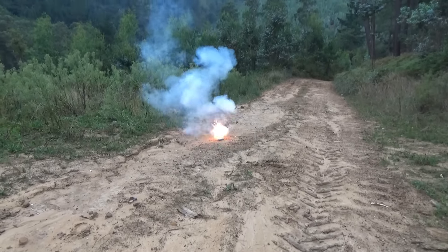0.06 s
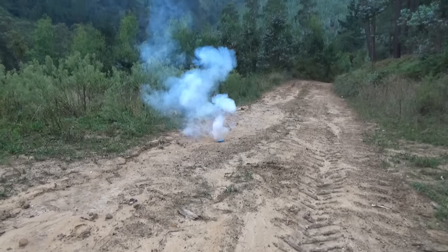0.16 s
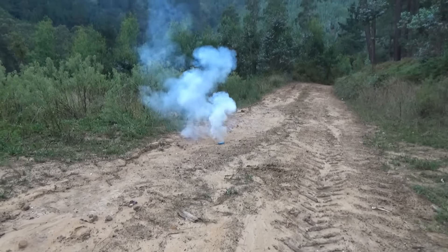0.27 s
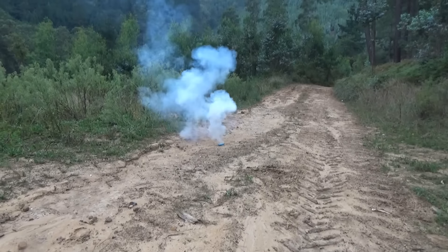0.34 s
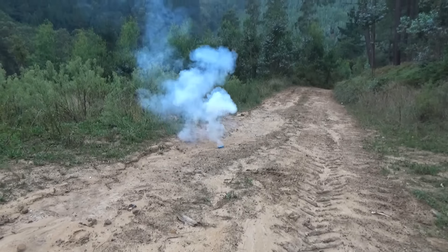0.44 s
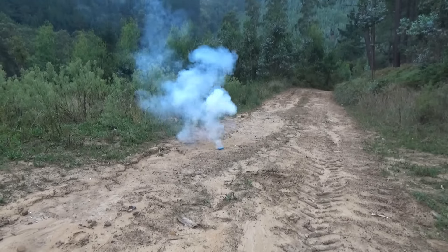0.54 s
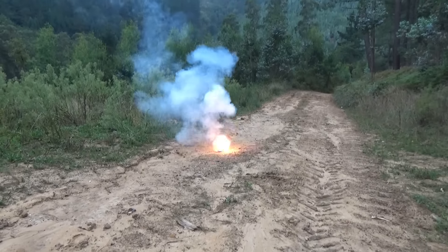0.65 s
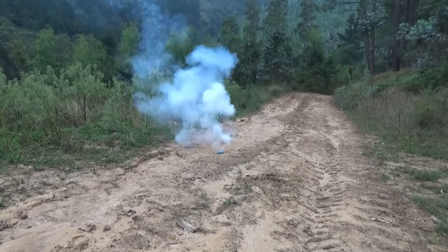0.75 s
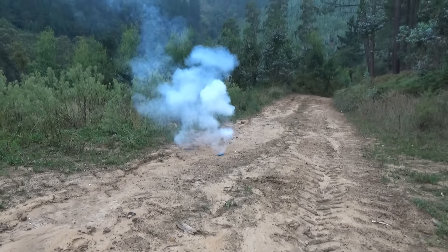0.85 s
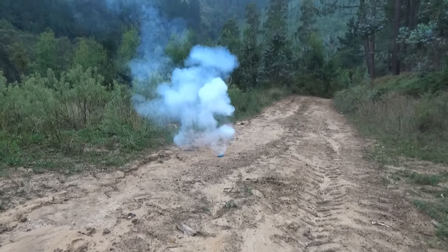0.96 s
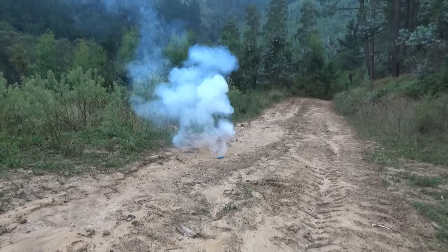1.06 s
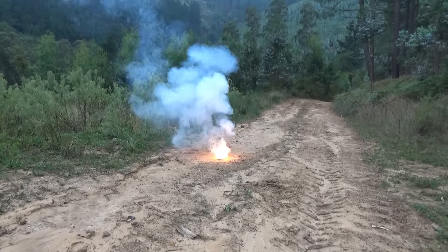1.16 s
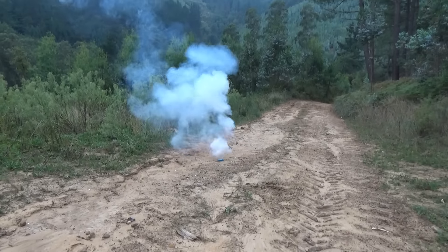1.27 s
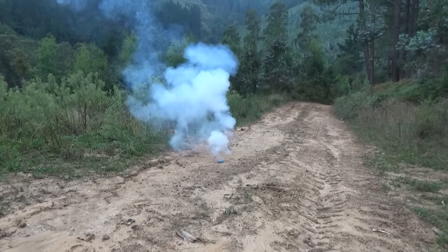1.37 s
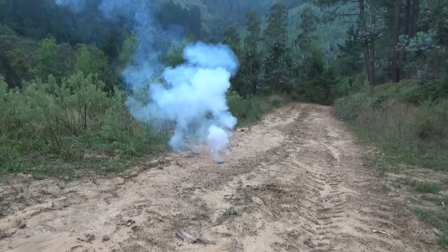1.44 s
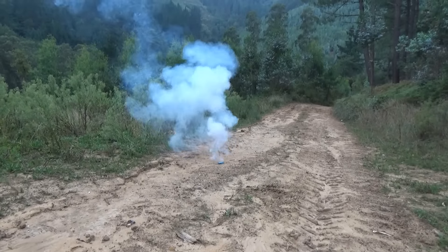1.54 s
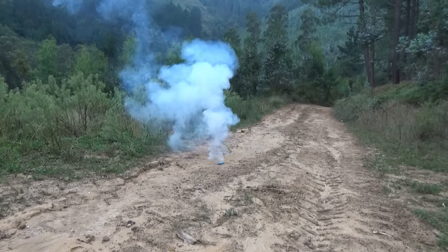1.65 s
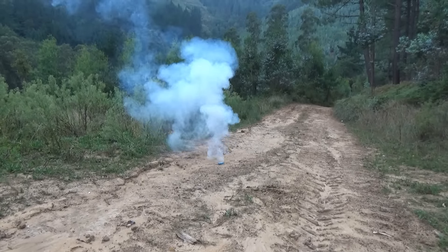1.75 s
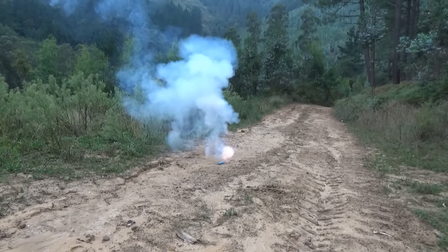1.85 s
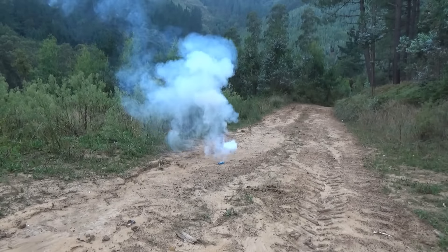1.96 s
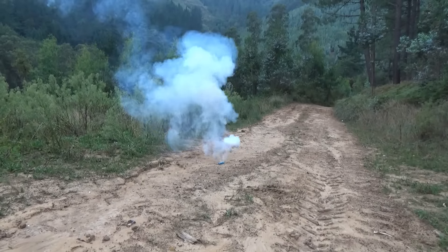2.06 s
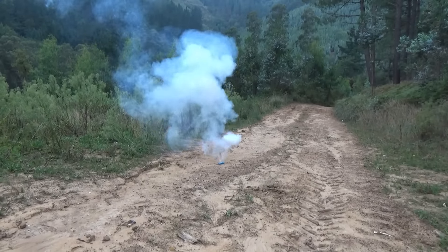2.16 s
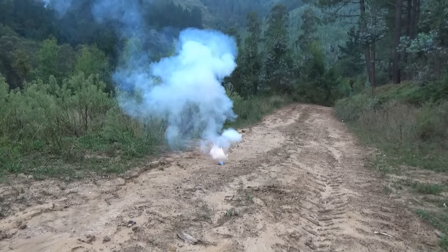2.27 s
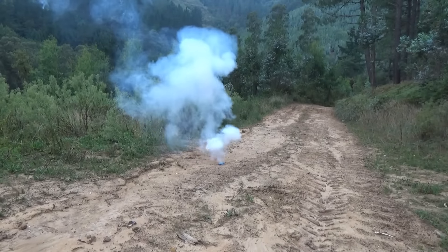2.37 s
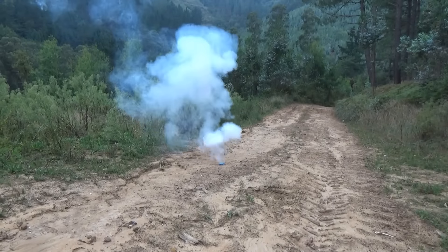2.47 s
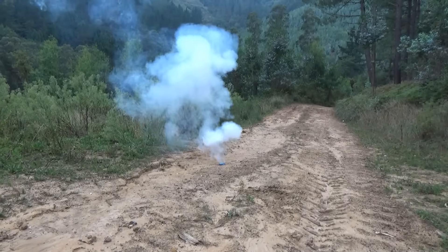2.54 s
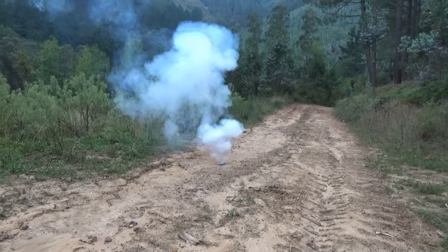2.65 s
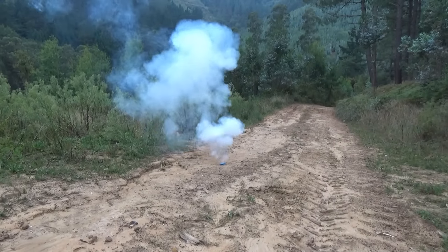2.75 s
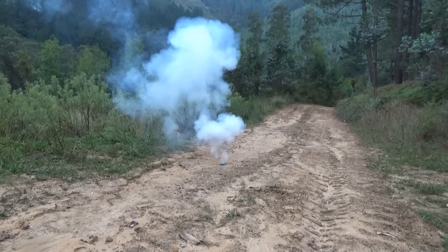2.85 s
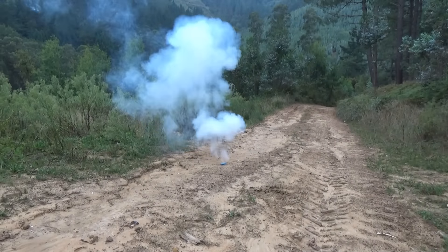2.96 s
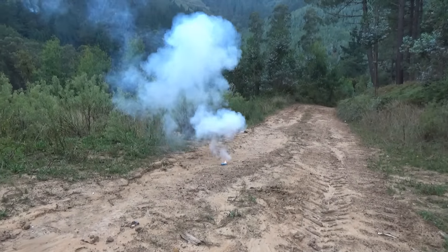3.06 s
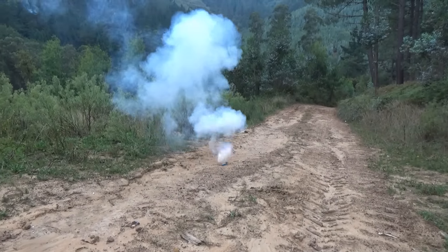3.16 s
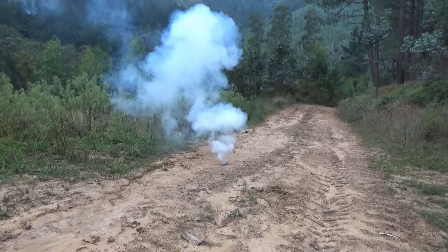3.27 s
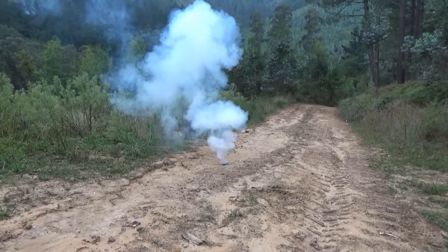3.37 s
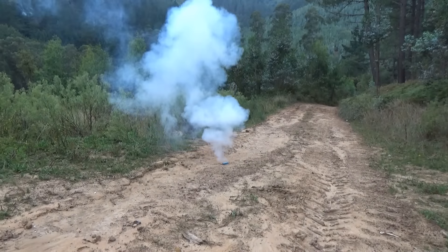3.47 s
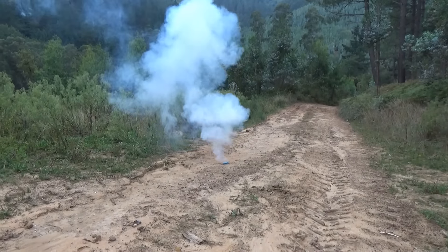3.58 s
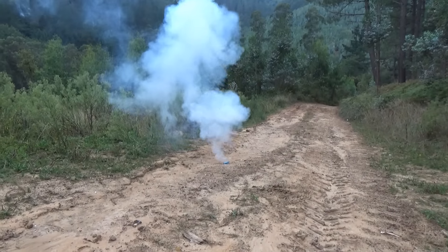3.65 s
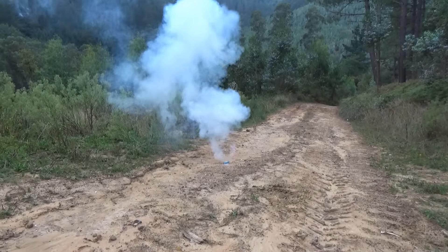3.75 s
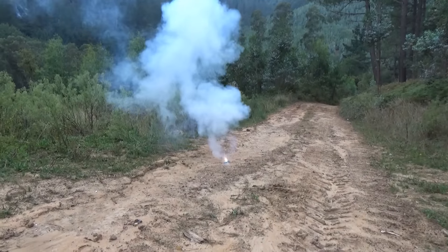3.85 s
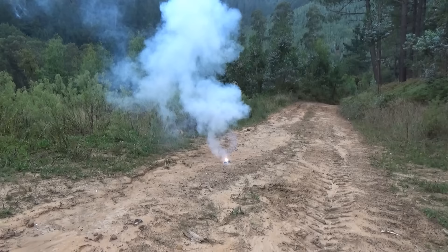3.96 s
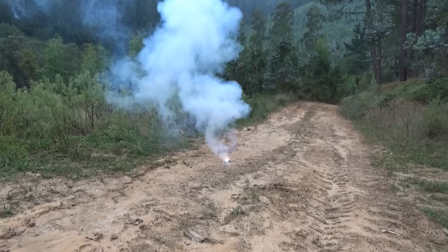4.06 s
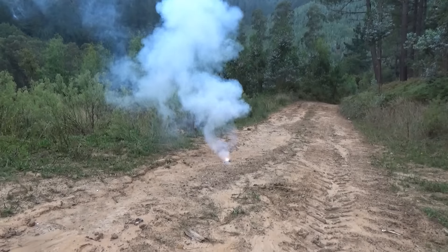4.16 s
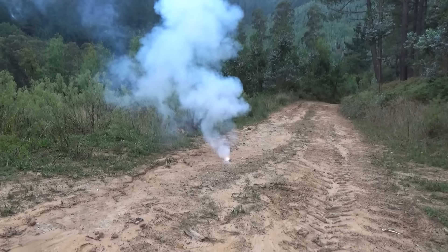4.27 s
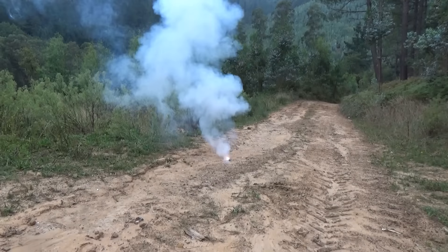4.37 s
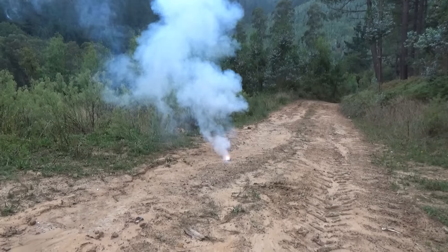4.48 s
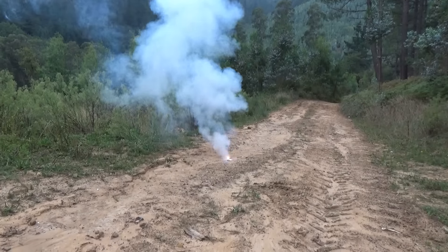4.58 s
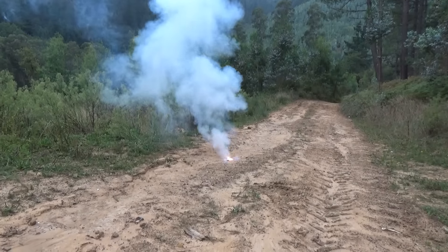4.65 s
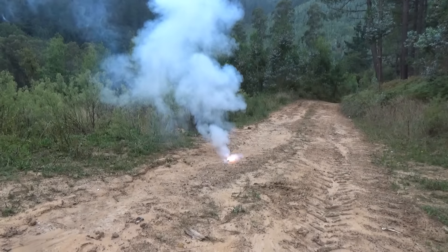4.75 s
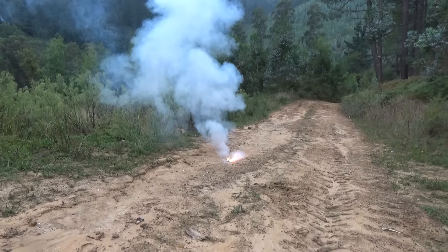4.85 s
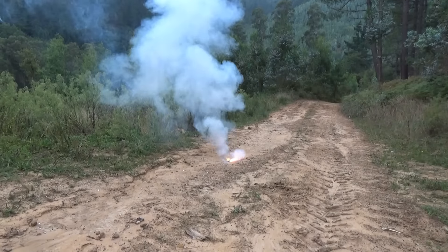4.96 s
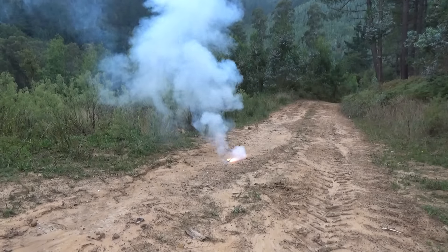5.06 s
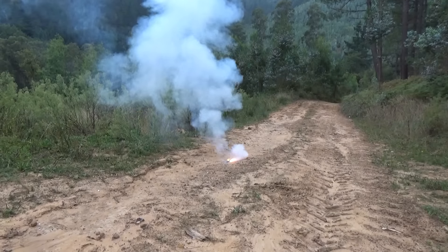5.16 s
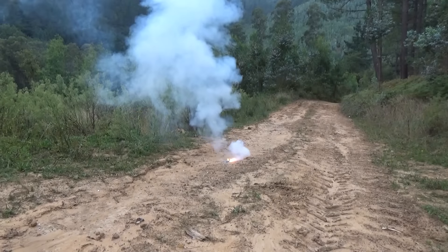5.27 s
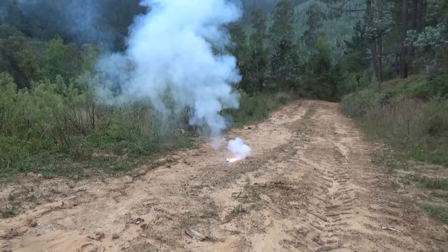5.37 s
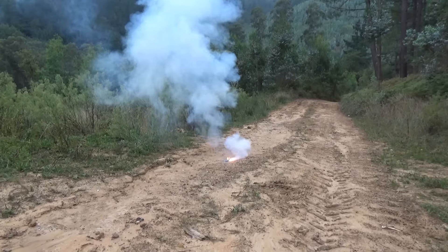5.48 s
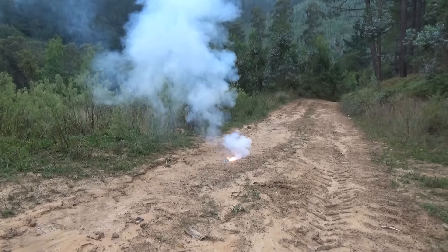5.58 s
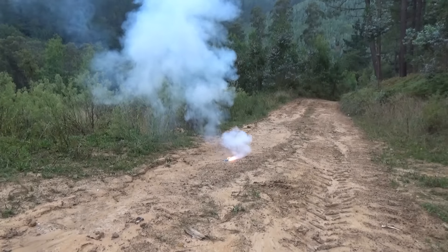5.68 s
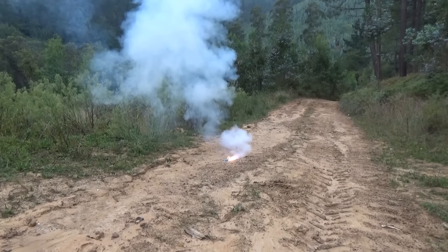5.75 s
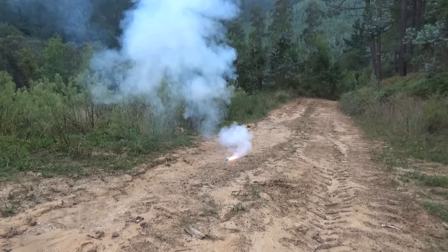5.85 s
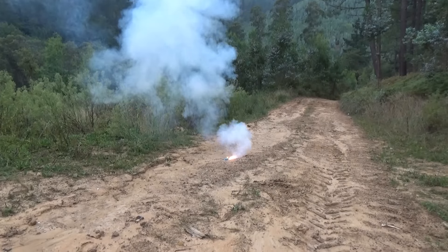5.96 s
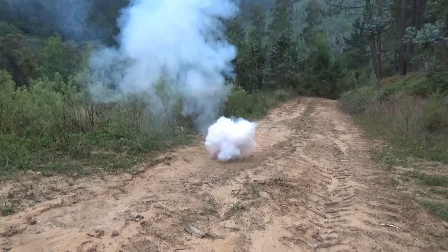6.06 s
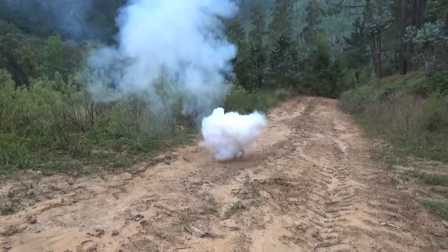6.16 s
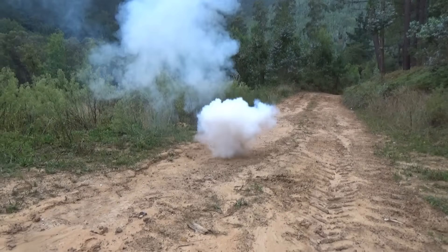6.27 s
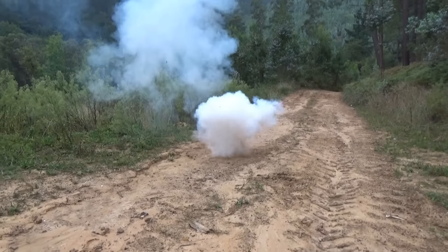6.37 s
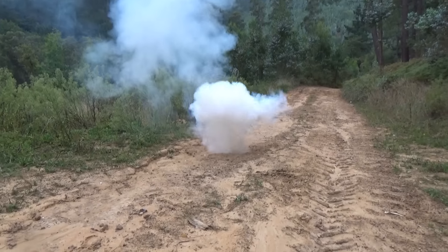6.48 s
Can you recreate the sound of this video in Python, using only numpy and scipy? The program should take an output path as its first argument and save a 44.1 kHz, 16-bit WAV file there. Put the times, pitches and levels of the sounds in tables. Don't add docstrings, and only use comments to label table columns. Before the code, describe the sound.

Outdoors on a dirt track among trees, a fuse hisses softly while seven hard, dry firecracker bangs go off about half a second apart, each with a low thump and a short ragged echo. Two soft gas puffs follow, then a rushing flame that sizzles and spits crackling sparks, ending in one loud blast with a dense roll. The microphone is some way off and limits the loudest peak.

```python
import sys
import numpy as np
from scipy import signal
from scipy.fft import rfft, irfft, next_fast_len
from scipy.io import wavfile
from scipy.ndimage import uniform_filter1d

SR = 44100
rng = np.random.default_rng(int(sys.argv[2]) if len(sys.argv) > 2 else 0)


def generate_wav(sig):
    pcm = np.round(np.clip(np.atleast_2d(sig).T, -1, 1) * 32767).astype(np.int16)
    wavfile.write(sys.argv[1], SR, pcm)


def rack_gain(trim_db):
    fader = np.asarray(trim_db, float)
    return 10 ** (fader / 20)


N = 287532
BLAST_S = 6.0765


def add(out, x, s):
    i = int(round(s * SR))
    out[:, i:i + x.shape[-1]] += x[..., :N - i]


def on_log(table, hz):
    f, db = np.transpose(table)
    return np.interp(np.log(hz + 1), np.log(f), db)


def walk(rate, size):
    hold = int(SR / rate)
    steps = np.repeat(rng.standard_normal(size // hold + 1), hold)
    return 0.92 * uniform_filter1d(uniform_filter1d(steps, hold), hold)[:size]


# (frequency [Hz], side minus mid level [dB])
DIFFUSENESS = [(40, -24.5), (110, -17.5), (250, -17), (700, -22.5), (2000, -20.5), (4000, -30.5),
               (6500, -14), (9500, -20.5), (13000, -37), (16000, -32)]


def rush(rows, colour, wide_db, flicker_db, clump_db, clump_rate):
    s, *levels = np.transpose(rows)
    size = next_fast_len(int((s[-1] - s[0]) * SR))
    hz = np.arange(size // 2 + 1) * SR / size
    t = s[0] + np.arange(size) / SR
    mid, side = rfft(rng.standard_normal((2, size))) * rack_gain(on_log(colour, hz))
    side = side * rack_gain(on_log(DIFFUSENESS, hz) + wide_db)
    pair = np.array([mid + side, mid - side])
    above = [1] + [1 / (1 + (edge / (hz + 1)) ** 10) for edge in (600, 4500, 11000)] + [0]
    clump = clump_db * walk(clump_rate, size)
    out = 0
    for k, db in enumerate(levels):
        band = irfft(pair * np.sqrt(above[k] - above[k + 1]), size)
        level_db = np.interp(t, s, db) + flicker_db * walk(13, size) + clump
        out = out + band / band.std() * rack_gain(level_db)
    return out


def follow(curve, tone_db, share=0):
    s, db, *extra_db = np.transpose(curve)[..., None]
    return np.hstack([s, db + tone_db + sum(extra_db) * np.array(share)])


def swells(events, start, end, tone_db, air_db_s, bend):
    t = np.arange(start, end, 1 / 1000)[:, None]
    lean = np.array((-0.69, -0.18, 0.71, 1.6))
    power = 1e-12
    for s, db, rise_s, fall_s, bright_db in events:
        away = np.where(t < s, (s - t) / rise_s, (t - s) / fall_s)
        power = power + rack_gain(db - 20 * away ** bend + bright_db * lean) ** 2
    return np.hstack([t, 10 * np.log10(power) + tone_db - np.multiply(air_db_s, t - start)])


def ring(hz, t60, phase, size=2000):
    t = np.arange(size) / SR
    return np.cos(2 * np.pi * hz * t - phase) * rack_gain(-60 * t / t60)


def dull(x, hz):
    return signal.sosfilt(signal.butter(2, min(hz, 20000), fs=SR, output="sos"), x)


def burst(rise_s, fall_s, hz):
    t = (np.arange(2500) - 1000) / SR
    envelope = np.exp(np.where(t < 0, t / rise_s, -t / fall_s))
    mid, side = dull(rng.standard_normal((2, len(t))), hz) * envelope
    return mid + 0.32 * side * np.array([[1], [-1]])


# (frequency [Hz], spectral density [dB per Hz])
SMOULDER_COLOUR = [(24, -49), (40, -5), (61, -4.5), (124, -3), (163, -5.5), (320, -10), (585, -10),
                   (1240, -9.5), (1900, -5.5), (2100, -13), (2570, -9.5), (4460, -13.5), (7000, -4.5),
                   (11600, -13), (16000, -14)]


def still_valley(out):
    still_db = (-50.5, -44.5, -62.5, -71)
    rows = [(0, *still_db), (N / SR, *still_db)]
    add(out, rush(rows, SMOULDER_COLOUR, wide_db=-7, flicker_db=1.5, clump_db=.5, clump_rate=33), 0)


# (time [s], level [dB])
SMOULDER = [(0, -44), (.5, -45.5), (.73, -42), (1.0, -61), (1.2, -42), (1.68, -45), (1.8, -40.5),
            (1.88, -33.5), (2.26, -43), (2.62, -47), (2.76, -54), (2.78, -36), (2.87, -47), (3.15, -69),
            (3.45, -43.5), (3.7, -43), (3.95, -43.5), (4.15, -54)]


def smoulder(out):
    rows = follow(SMOULDER, (-18, -3.5, -4.5, -9.5))
    add(out, rush(rows, SMOULDER_COLOUR, wide_db=-7, flicker_db=1.2, clump_db=1, clump_rate=33), 0)


# (time [s],
# level [dB], frequency [Hz])
POPS = [(0.096, -22, 500), (2.6468, -22, 382), (2.651, -25, 310), (2.6655, -13, 355), (3.148, -13.5, 286),
        (3.1542, -25, 294), (3.581, -21, 243), (3.61, -20, 190), (6.0704, -4.5, 490), (6.0841, -4.5, 384),
        (6.0922, -11, 304), (6.1, -10, 334), (.5, -33.5, 150), (6.174, -16, 170), (6.219, -10, 150),
        (6.265, -14, 200), (6.301, -14, 259), (6.471, -8, 280)]


def pops(out):
    for s, db, hz in POPS:
        add(out, rack_gain(db + 2) * ring(hz, 5.5 / hz, np.pi / 2), s)


# (time [s], front level [dB], thump level [dB], echo level [dB], far slope level [dB])
BANGS = [
    (0.1006, -3, -20.5, 1, 2),
    (0.7338, -11, -14, 0.5, 1.5),
    (1.2003, 0.5, -9, -0.5, 3),
    (1.8854, -4.5, -16.5, 0.5, 0.5),
    (2.281, -1.5, -13.5, -1, 2.5),
    (2.656, -7, -18.5, -3, 0.5),
    (3.1596, 1.5, -11.5, -1, 1.5),
]
# (delay [s], level [dB], rise [s], fall [s], brightness [dB])
FOREST = [
    (.011, -22.5, 0.014, 0.052, -9.5),
    (.024, -26, .015, 0.014, 9.5),
    (.04, -17, 0.02, 0.014, -4),
    (.05, -21, 0.0071, 0.0084, 6.5),
    (.06, -15.5, 0.014, 0.036, -1),
    (.09, -22.5, 0.015, 0.041, 2.8),
    (.122, -29, 0.037, 0.062, 5.5),
    (.155, -25, 0.078, 0.19, 3.5),
    (.29, -44, 0.062, 0.11, -26),
    (.33, -40.5, 0.45, 0.35, 1.5),
]
# (delay [s], level [dB], ring frequency [Hz])
TRUNKS = [
    (.0022, -18, 1100),
    (.008, -7, 744),
    (.0285, -4, 6000),
    (.0358, -5.5, 3000),
    (.0625, -9, 1700),
    (.0895, -13, 2600),
    (.1425, -19, 2450),
    (.173, -52, 2200),
]
# (frequency [Hz], spectral density [dB per Hz])
ECHO_COLOUR = [(24, -54), (40, -16), (231, -7.5), (345, -13.5), (412, -13.5), (455, -8.5), (615, -8),
               (770, -7.5), (896, -5), (2770, -4), (4240, -13), (9690, -12), (16000, -22)]


def bangs(out):
    answer = swells(FOREST, .002, .62, (-14.5, -0.5, -4.5, -6.5), (21.5, 6, 22.5, 104), bend=1.24)
    fixed = rush(answer, ECHO_COLOUR, wide_db=1, flicker_db=.8, clump_db=2.4, clump_rate=400)
    t = answer[0][0] + np.arange(fixed.shape[1]) / SR
    for k, (s, db, hz) in enumerate(TRUNKS):
        side_db = np.array([[1.2], [-1.2]]) * (-1.0) ** k
        add(fixed, rack_gain(db) * ring(hz, 5 / hz, 0.74) * rack_gain(side_db), max(s - t[0], 0))
    lean_db = np.array([[-.3], [.3]])
    far = np.clip((t - .07) / .04, 0, 1)
    for s, front_db, thump_db, echo_db, far_db in BANGS:
        front = rack_gain(front_db + 2) * ring(350, .0066, 0) + rack_gain(thump_db) * ring(135, .05, 3.7)
        front[:4] = -.6 * np.array([0.29, 0.75, 0.55, .2])
        add(out, front * np.array([[1.05], [.95]]), s - 4 / SR)

        ragged_db = -12 - 0.55 * (thump_db + 10.5)
        rough = burst(0.00026, 0.0011, 14300)
        rough = rough + 0.23 * burst(0.012, 0.0066, 9000)
        rough = rough + 2.0 * burst(0.0051, 0.016, 660)
        add(out, rack_gain(ragged_db) * rough, s - 1000 / SR)

        stirred = rush(answer, ECHO_COLOUR, wide_db=1, flicker_db=1.4, clump_db=1.8, clump_rate=400)
        duck_db = -1.5 * max(thump_db + 15, 0) * np.exp(-(t / .016) ** 2)
        level_db = echo_db + duck_db + far_db * far + lean_db
        add(out, (0.94 * fixed + 0.5 * stirred) * rack_gain(level_db), s + t[0])


# (time [s], peak level [dB], ring frequency [Hz])
SPARKS = [(4.2401, -29.7, 10100), (4.4888, -25, 10100), (4.5445, -24, 10800), (4.5524, -27.7, 10100),
          (4.6119, -22, 7800), (4.6386, -14.4, 9700), (4.675, -19.5, 10400), (4.7113, -20, 9100),
          (4.7308, -20, 8600), (4.7936, -13.4, 10100), (4.8139, -14.5, 9400), (4.9104, -12, 9600),
          (4.989, -14.8, 8800), (5.0301, -8.8, 10700), (5.1189, -13.7, 9100), (5.2955, -15.7, 8900),
          (5.3767, -10, 8800), (5.4269, -7.5, 9000), (5.4489, -12, 9500), (5.4751, -10.5, 8700),
          (5.5094, -13, 8500), (5.5377, -12.6, 8500), (5.6408, -7.5, 8800), (5.6646, -12, 10600),
          (5.8006, -6, 11400), (5.8201, -14.5, 8400), (5.9033, -14, 8400), (6.0082, -13, 7800),
          (6.0412, -10, 7900)]


def sparks(out):
    start_s, grows_s = 4.42, .35
    late, luck, pitch = rng.random((600, 3)).T
    late = late * (BLAST_S - start_s)
    size_db = -31 - 4.5 * np.log(luck + 0.13) - 14 * np.clip(1 - late / grows_s, 0, 1)
    crackle = list(zip(start_s + late, size_db, 7000 + 3500 * pitch))
    stray = (2.962, -27, 8500)
    for s, db, hz in list(SPARKS) + crackle + [stray]:
        low = ring(.94 * hz, .002, np.pi / 2, size=300)
        high = ring(1.45 * hz, .001, np.pi / 2, size=300)
        click = np.diff(low + .22 * high, 2)
        click = click * rack_gain(db + 3) / np.abs(click).max()
        add(out, click * np.array([[1.08], [.92]]), s)
        add(out, rack_gain(-16) * click, s + 0.0024)


# (time [s], level [dB], rise [s], fall [s], brightness [dB])
PUFFS = [
    (3.578, -34, 0.006, .02, 3),
    (3.6, -27.5, 0.022, 0.027, 5),
    (3.755, -35, .012, 0.033, 9.5),
    (3.778, -28, .032, .075, 5.5),
    (3.82, -26.5, 0.062, 0.057, 2.5),
    (3.862, -26, 0.053, 0.041, -5),
]
# (frequency [Hz], spectral density [dB per Hz])
PUFF_COLOUR = [(24, -76.5), (40, -17), (204, 8), (455, 3.5), (600, -3.5), (697, -8.5), (1370, -6),
               (2980, -7.5), (3470, -16.5), (13800, -1.5), (16000, 2)]


def puffs(out):
    rows = swells(PUFFS, 3.55, 3.95, (-11, -1, -0.5, -11), 0, bend=2.4)
    gas = rush(rows, PUFF_COLOUR, wide_db=-9, flicker_db=0.4, clump_db=0.6, clump_rate=240)
    add(out, gas, rows[0][0])


# (time [s], strength [dB], jet hiss [dB])
FLAME = [(3.74, -55, -2), (3.9, -36.5, 4.2), (4.1, -35, 0), (4.37, -36, 0.7), (4.52, -33, -1.5),
         (4.62, -35, 2), (4.74, -33, 3), (4.78, -32.5, -2), (5.0, -35, -5), (5.401, -32.5, -6.5),
         (5.7, -34, -5.5), (5.82, -30, -4), (6.091, -32, -6)]
# (frequency [Hz], spectral density [dB per Hz])
JET_COLOUR = [(25, -21), (45, -18), (90, -2), (250, 1.5), (600, -6.5), (1200, -12.5), (2200, -15.5),
              (4600, -30.5), (6300, -21), (8600, -17), (10200, -18.5), (11800, -23), (14500, -20),
              (16200, -37)]
FUSE_LEFT_DB = np.array([[.25], [-.25]])


def flame(out):
    jet_share = (0.05, 1, .3, 0.74)
    rows = follow(FLAME, (-1.2, -0.5, -53, -15.5), jet_share)
    roar = rush(rows, JET_COLOUR, wide_db=-9, flicker_db=1.2, clump_db=0.7, clump_rate=91)
    add(out, roar * rack_gain(FUSE_LEFT_DB), FLAME[0][0])


# (time [s], level [dB])
SIZZLE = [(4.451, -68), (4.59, -53), (4.64, -40.5), (4.77, -46), (4.795, -31.5), (4.86, -38), (4.92, -34),
          (5.1, -36), (5.5, -33), (5.72, -34), (6.09, -35.5)]


def sizzle(out):
    rows = follow(SIZZLE, (-34, -38, 1, -22))
    hiss = rush(rows, JET_COLOUR, wide_db=-9, flicker_db=.8, clump_db=1.6, clump_rate=91)
    add(out, hiss * rack_gain(FUSE_LEFT_DB), SIZZLE[0][0])


# (time [s], level [dB], rise [s], fall [s], brightness [dB])
BLAST = [
    (6.08, -16, 0.016, 0.23, 2.5),
    (6.09, -21.5, .015, 0.062, -18),
    (6.135, -20, 0.04, 0.042, -12),
    (6.235, -19, 0.17, 0.14, 3),
    (6.31, -16.5, .12, 0.13, -0.7),
    (6.365, -20, 0.064, 0.15, -14.5),
    (6.41, -20, 0.084, .4, -4),
]
# (frequency [Hz], spectral density [dB per Hz])
BLAST_COLOUR = [(24, -61), (40, -23), (151, -2), (194, -5.5), (269, 2), (556, -8), (852, -4.5),
                (1120, -5.5), (2770, -10), (4680, -22.5), (10200, -22), (14100, -27), (16000, -37)]


def blast(out):
    rows = swells(BLAST, BLAST_S - .02, N / SR, (-2.2, -1, -4.5, -7.5), (11, 2.5, 0.5, 62), bend=1.25)
    roll = rush(rows, BLAST_COLOUR, wide_db=1.0, flicker_db=-0.1, clump_db=1.5, clump_rate=170)
    add(out, roll * rack_gain(np.array([[-.3], [.3]])), rows[0][0])
    add(out, rack_gain(-7) * burst(.0008, 0.004, 15000), BLAST_S - 1000 / SR)


def scene():
    out = np.zeros((2, N))
    for source in (still_valley, smoulder, pops, bangs, sparks, puffs, flame, sizzle, blast):
        source(out)
    return out


def low_pass(x):
    return signal.sosfilt(signal.butter(12, 16620, fs=SR, output="sos"), x)


def record(dry):
    x = signal.sosfilt(signal.butter(2, 48, "high", fs=SR, output="sos"), dry)
    ceiling = .93
    x = ceiling * x / (ceiling ** 6 + np.abs(x) ** 6) ** (1 / 6)
    x = signal.sosfilt(signal.ellip(8, .2, 70, 15950, fs=SR, output="sos"), x)
    return low_pass(x)


dry = scene()
out = record(dry)
generate_wav(out)
```